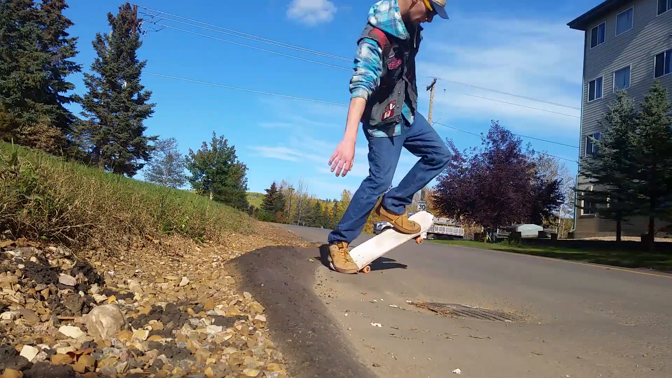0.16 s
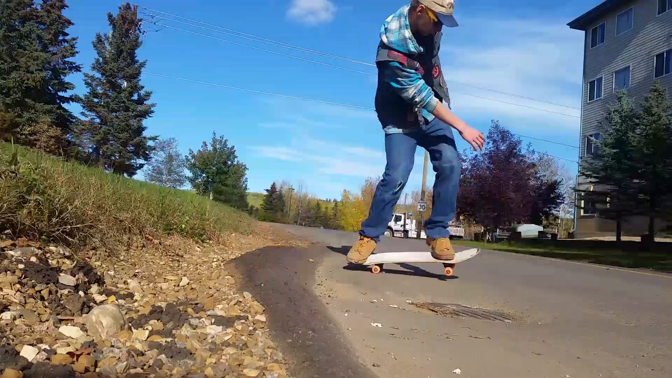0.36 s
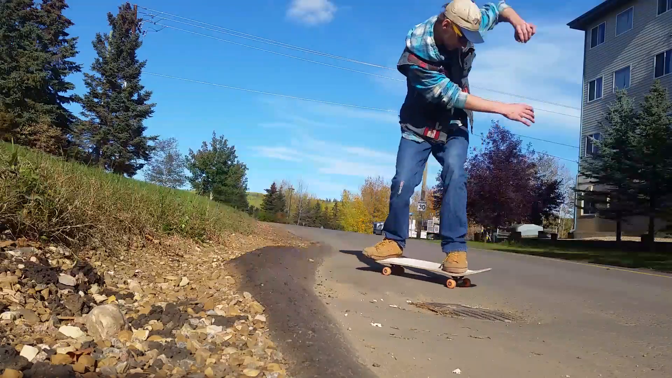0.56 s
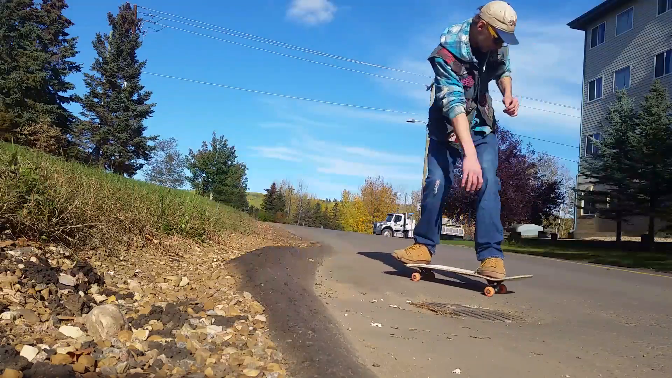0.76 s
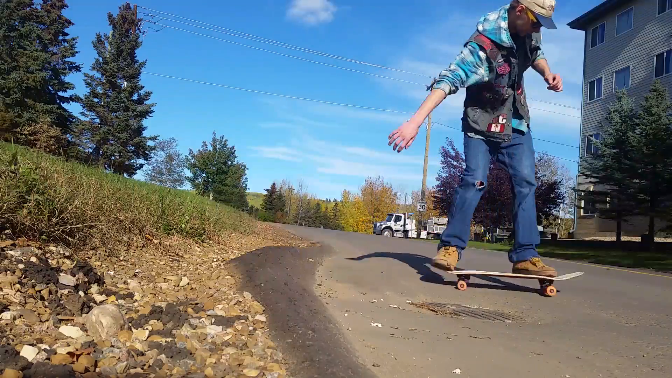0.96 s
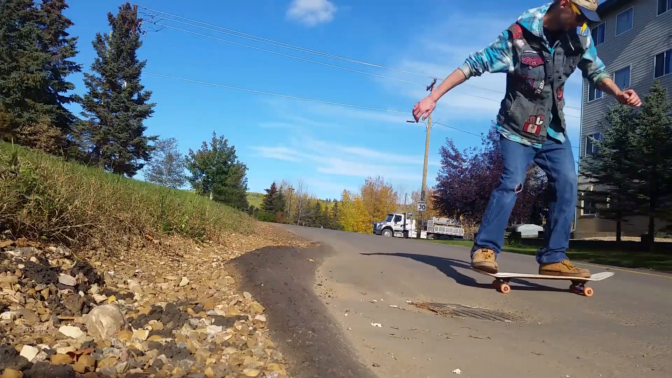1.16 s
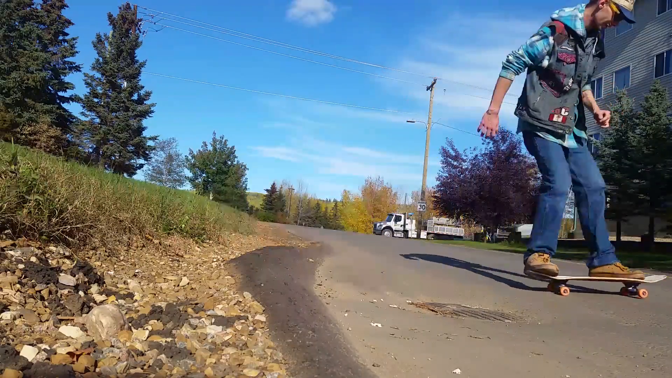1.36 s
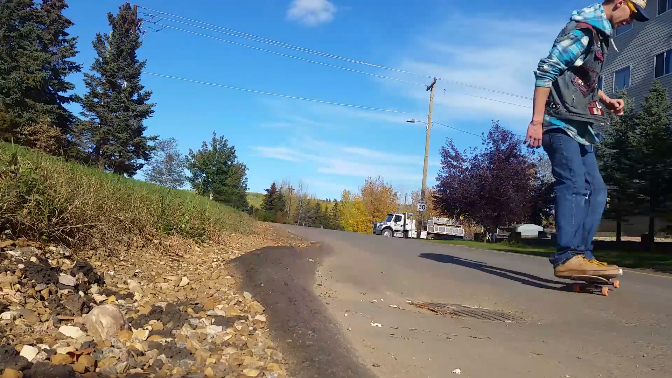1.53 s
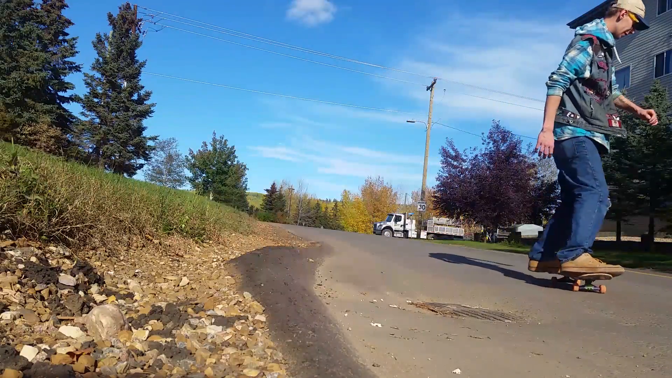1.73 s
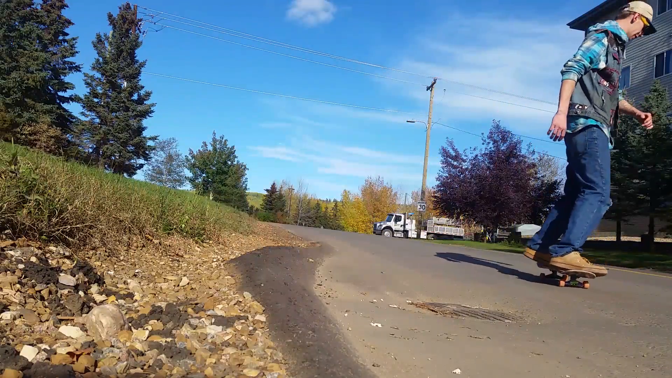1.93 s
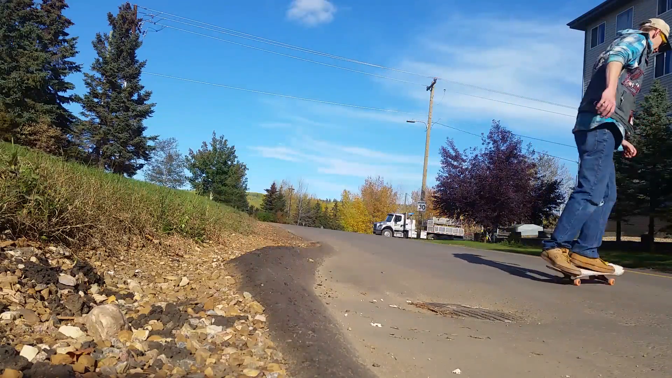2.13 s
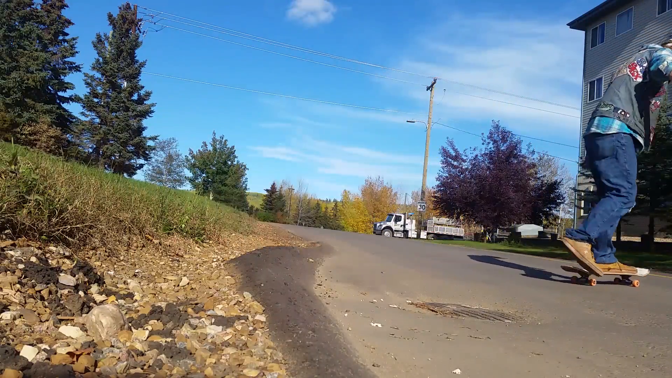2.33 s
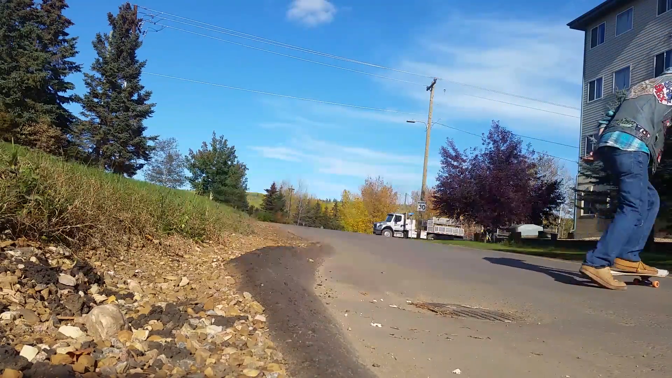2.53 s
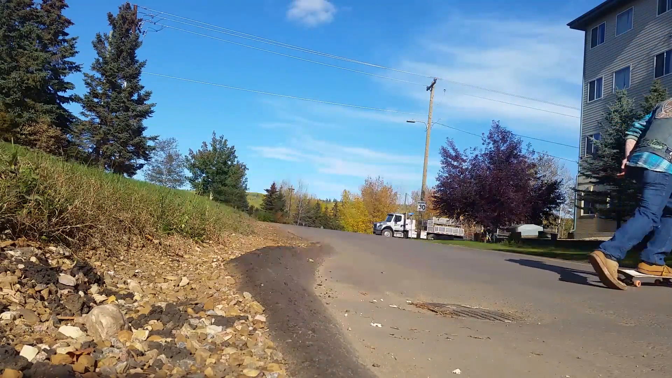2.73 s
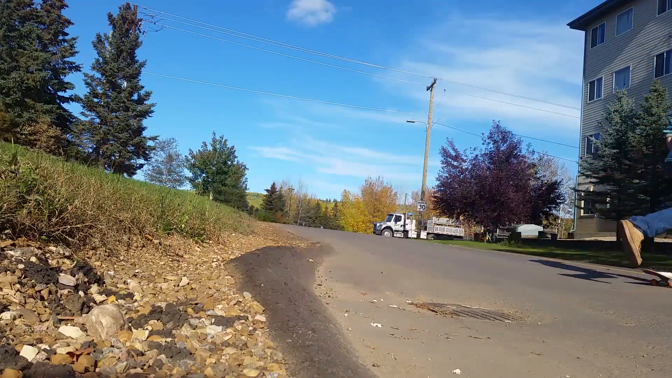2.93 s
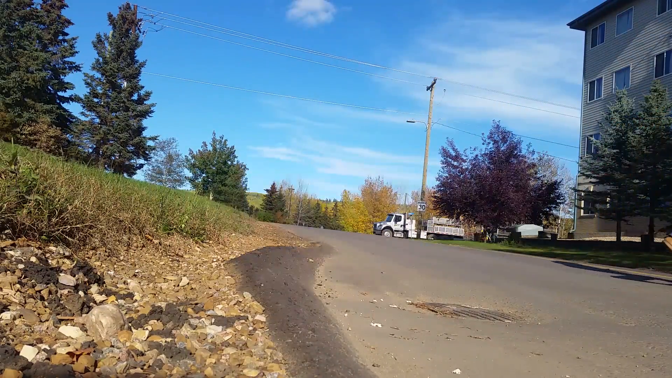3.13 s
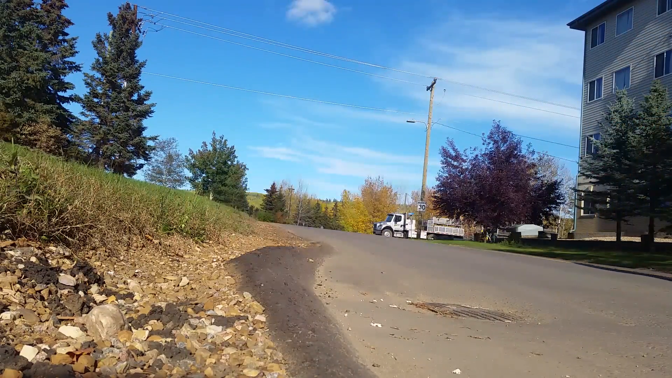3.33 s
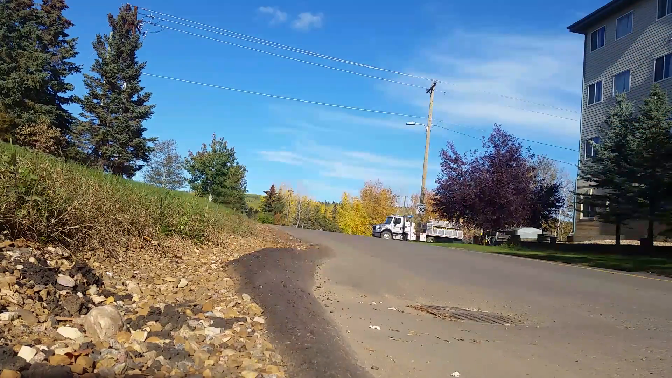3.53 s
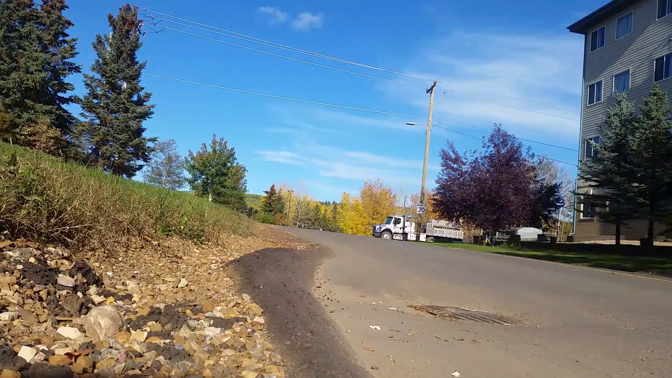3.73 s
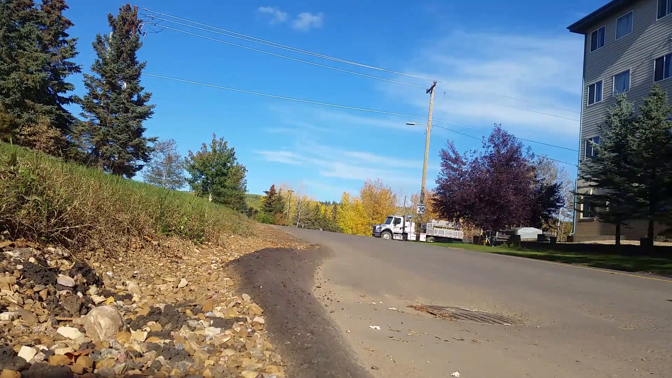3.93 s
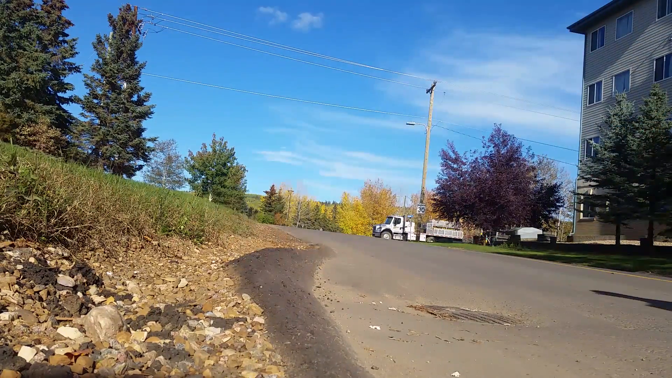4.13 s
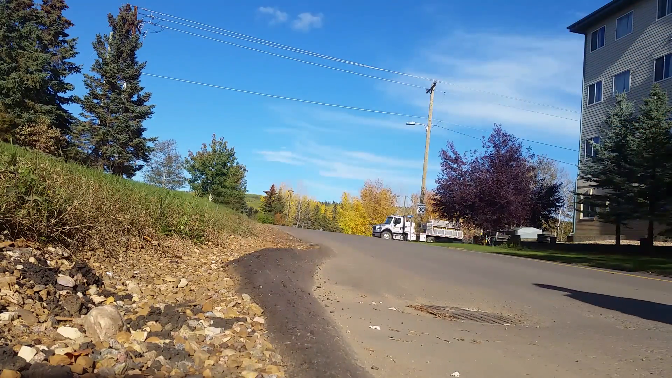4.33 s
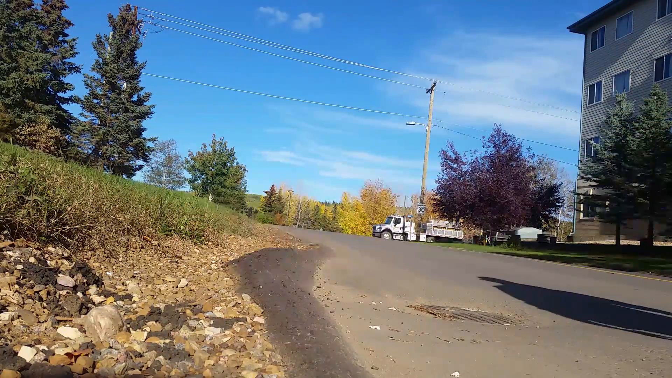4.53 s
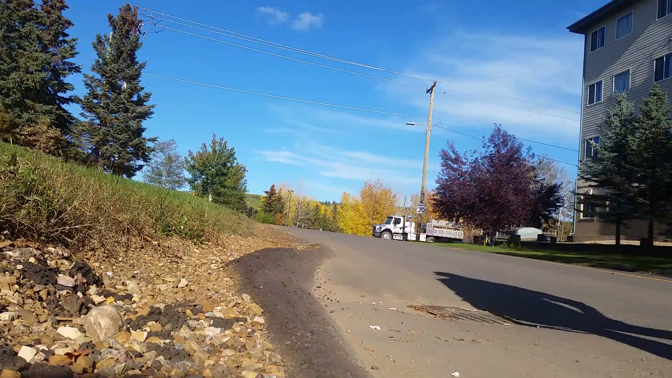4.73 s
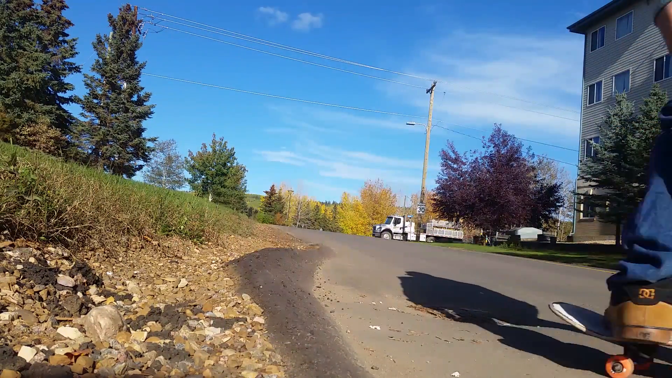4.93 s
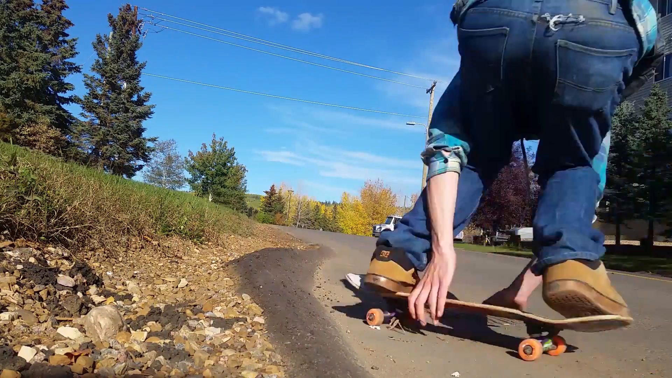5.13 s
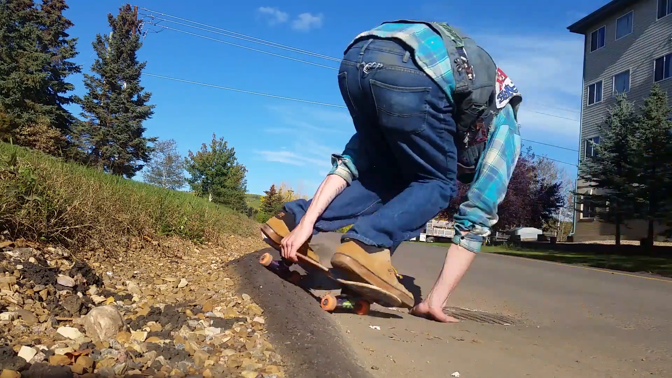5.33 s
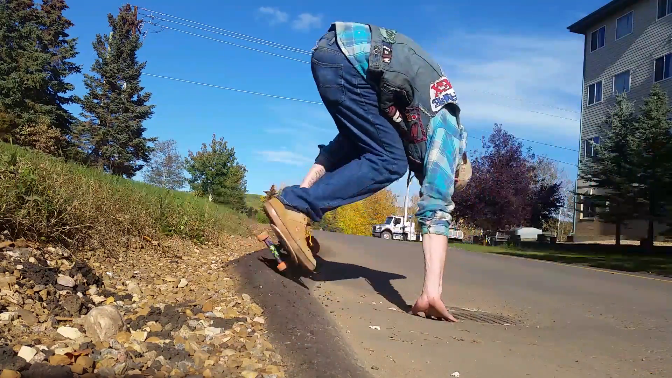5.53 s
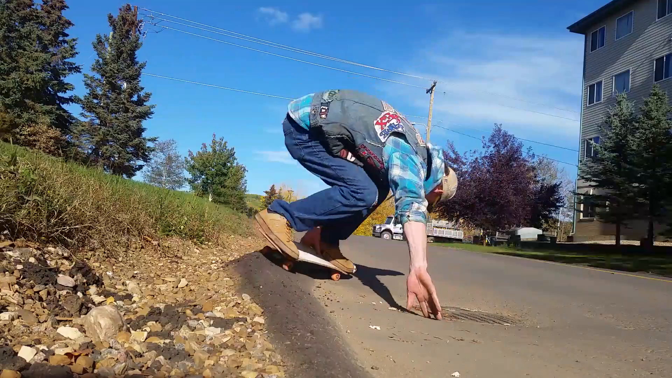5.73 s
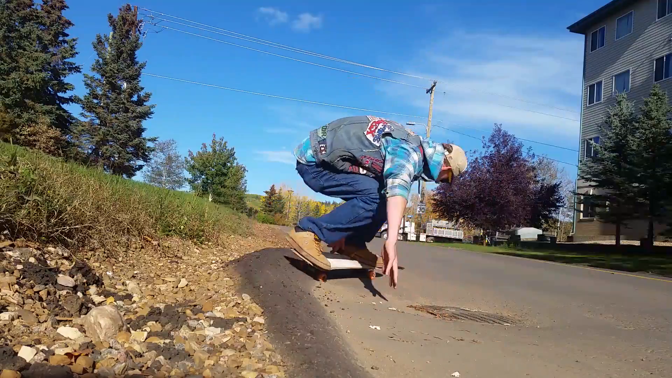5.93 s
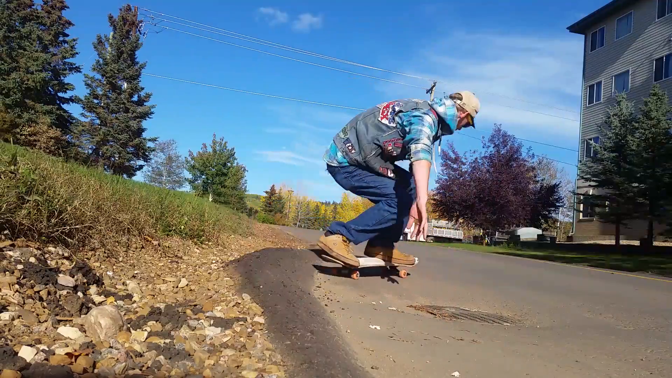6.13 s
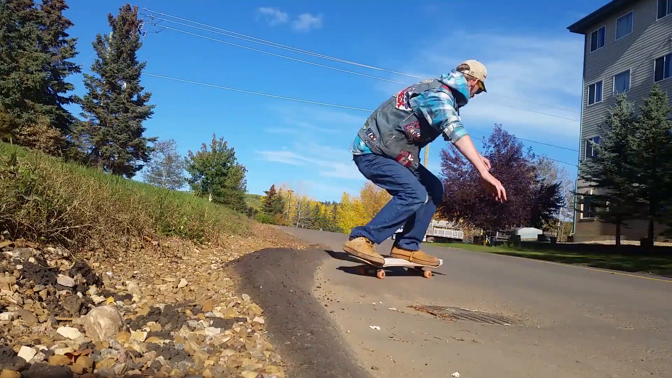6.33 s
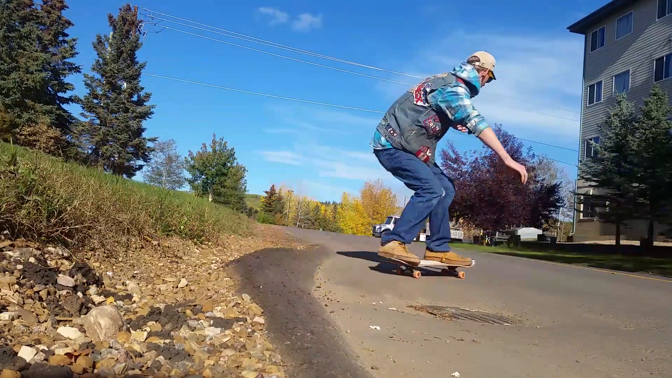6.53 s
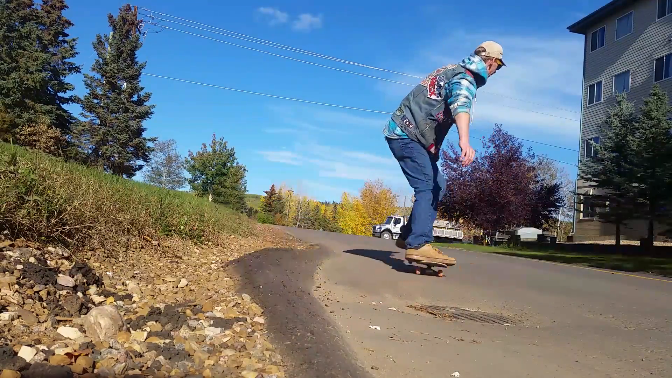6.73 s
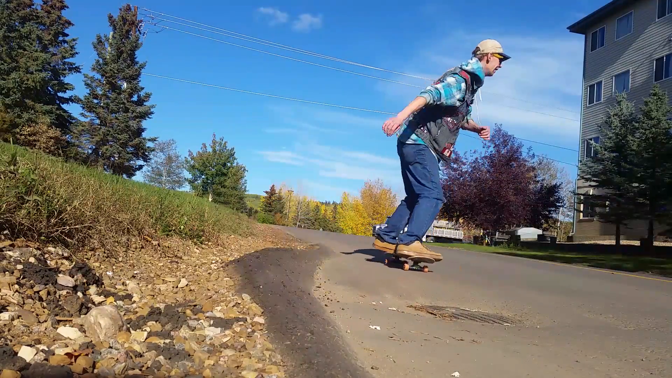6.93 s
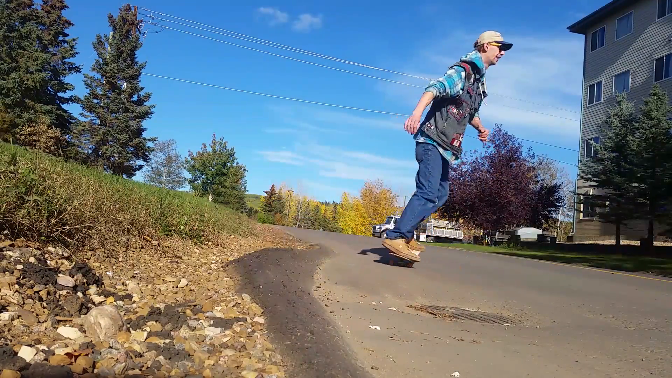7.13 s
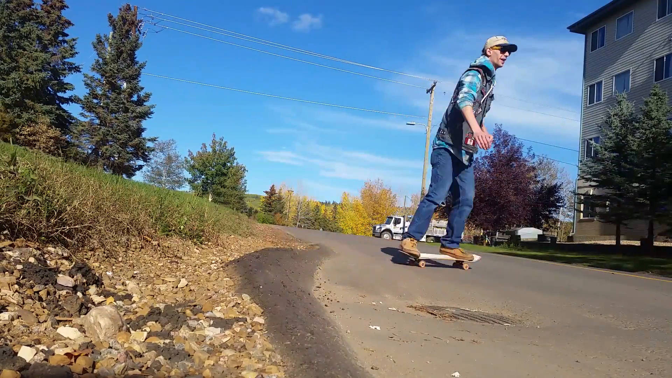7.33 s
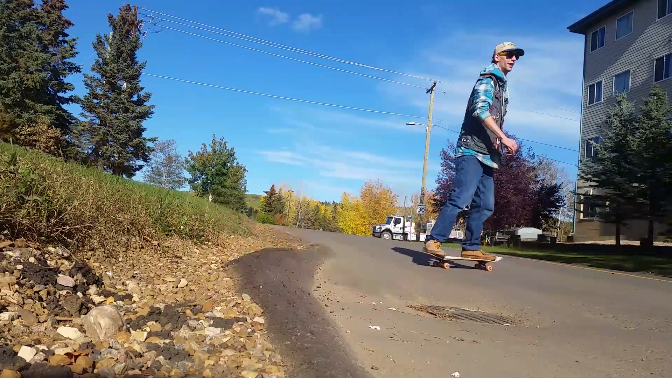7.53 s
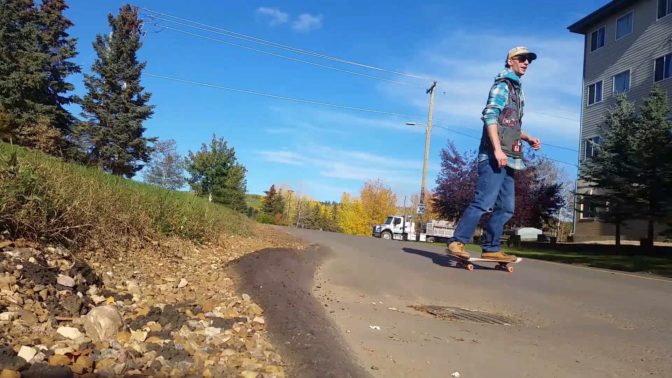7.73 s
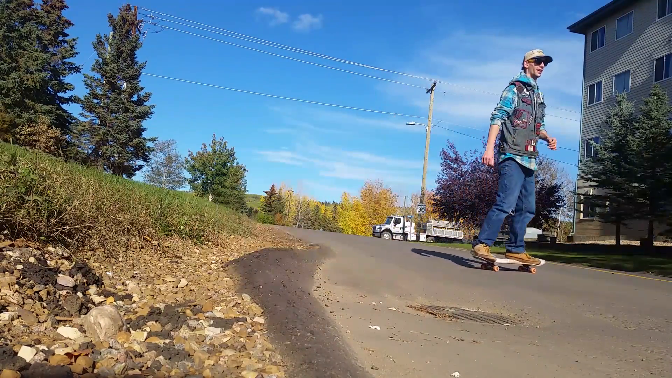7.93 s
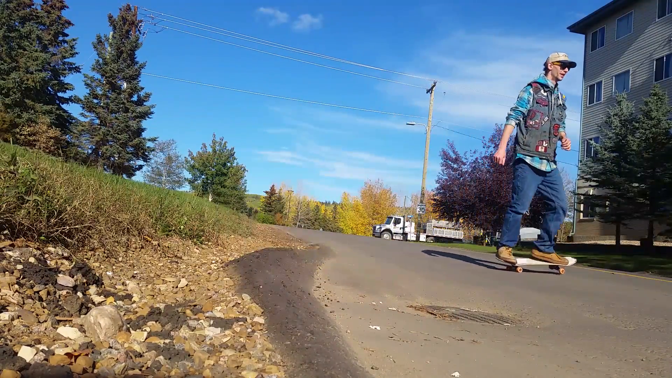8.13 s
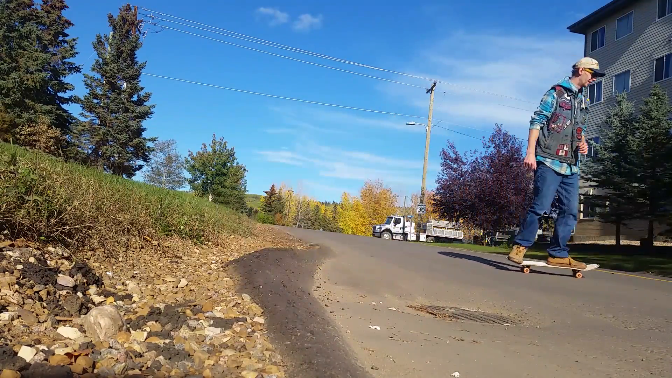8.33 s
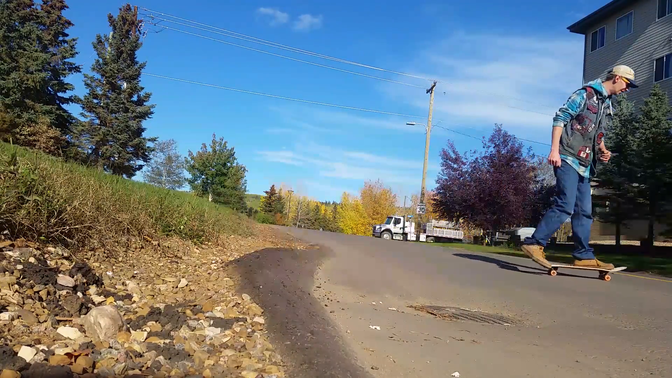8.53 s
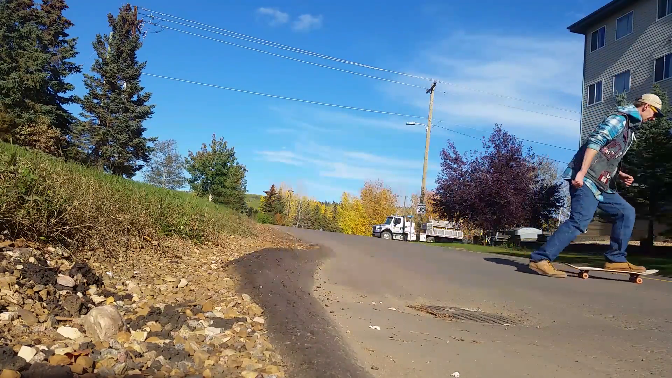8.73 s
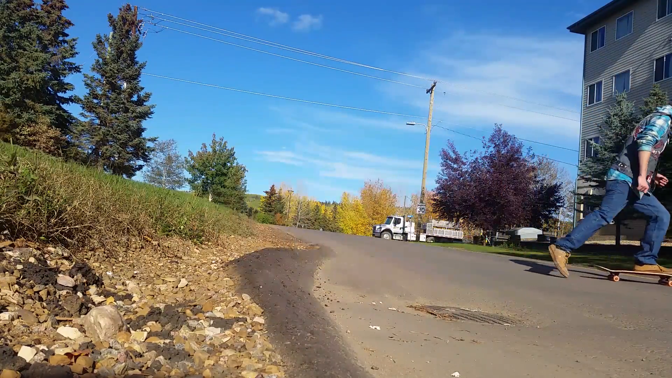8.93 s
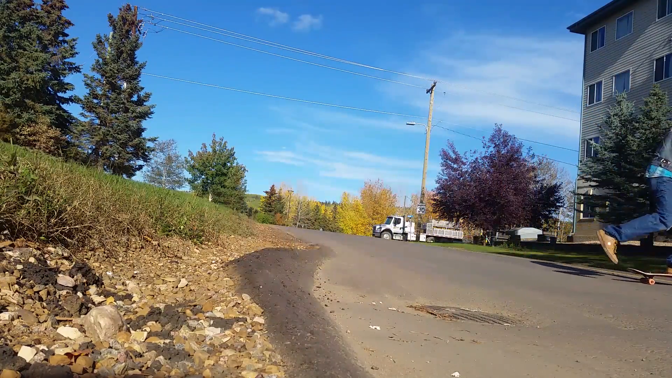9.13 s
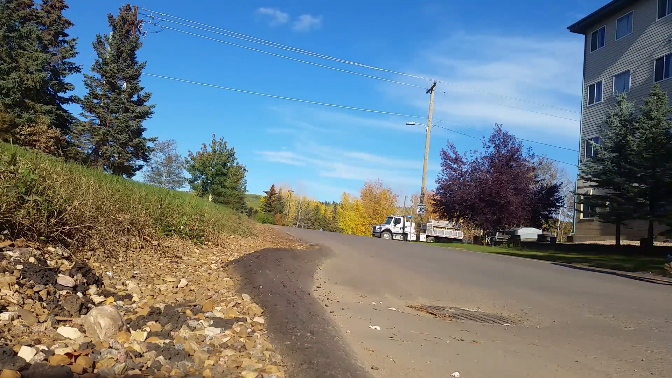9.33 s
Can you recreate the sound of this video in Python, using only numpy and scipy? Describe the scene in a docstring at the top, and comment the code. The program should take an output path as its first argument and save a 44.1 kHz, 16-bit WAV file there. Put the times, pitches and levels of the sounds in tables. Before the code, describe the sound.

Hard skateboard wheels rumble over gritty road, wooden deck slaps in quick runs, a close roaring carve with scraping, then fading rolls and light wind.

```python
"""Hard wheels rumble and rattle over rough asphalt: a skateboard rolls off to the right, comes back close by,
carves up a bank and leaves again. Road grain shakes wheels, trucks and deck, harder in most swerves;
nose slaps ring the board's modes in quick runs, and noise bursts make scrapes, sand and pebble snaps.
Two closely spaced microphone ports hear it outdoors, with light wind and a building that answers."""
import sys
import numpy as np
from scipy import signal
from scipy.fft import rfft, irfft
from scipy.io import wavfile
from scipy.ndimage import uniform_filter1d, map_coordinates

SR = 44100
rng = np.random.default_rng(int(sys.argv[2]) if len(sys.argv) > 2 else 0)


def generate_wav(signal):
    """Clip the signal to [-1, 1] and save it as 16-bit WAV at the path in sys.argv[1]."""
    frames = np.transpose(np.atleast_2d(signal))
    scaled = np.clip(frames, -1, 1) * 32767
    pcm = np.round(scaled).astype(np.int16)
    wavfile.write(sys.argv[1], SR, pcm)


N = 413216
TIME = np.arange(N) / SR

# modes of deck, trucks and wheels: f/Hz, relative level/dB, t60/s
BOARD_MODES = [(127, -10, 0.13), (237, -0.5, 0.036), (389, -1.5, 0.04), (482, -5.5, 0.059),
               (784, -5, 0.027), (900, -6.5, 0.04), (1088, -3, 0.048), (1235, -5.5, 0.065),
               (1579, -4.5, 0.043), (1733, -3, 0.047), (1920, 0, 0.02), (2360, -4.5, 0.028),
               (2586, -4, 0.014), (2860, -9.5, 0.039), (3300, -13.5, 0.014)]
DECK_TOP_HZ = 600   # modes below this belong to the deck's thud


def from_db(db):
    """Decibels to gain."""
    return 10 ** (np.asarray(db) / 20)


def rms_one(x):
    """Scale to rms 1."""
    return x / np.sqrt(np.mean(x ** 2) + 1e-20)


def steadied(x, seconds):
    """Rms 1 over every stretch of this length; quicker lumps stay."""
    return x / np.sqrt(uniform_filter1d(x ** 2, int(seconds * SR)) + 1e-12)


def in_time(rows):
    """Each column of a curve at every sample."""
    s, *columns = np.transpose(rows)
    return [np.interp(TIME, s, column) for column in columns]


def drift(rate):
    """Smooth chance with a spread near 1, changing `rate` times a second."""
    knots = rng.standard_normal(4096)
    return map_coordinates(knots, [TIME * rate], order=2, mode="wrap")


def swell(middle_s, length_s):
    """Bell of height 1, this long at half height."""
    return np.exp2(-np.minimum((2 * (TIME - middle_s) / length_s) ** 2, 60))


def held(start_s, end_s, rise_db_per_s, fall_db_per_s):
    """Gain that rises to 1, holds from start to end and dies away."""
    before_db = rise_db_per_s * np.maximum(start_s - TIME, 0)
    after_db = fall_db_per_s * np.maximum(TIME - end_s, 0)
    return from_db(-np.minimum(before_db + after_db, 200))


def colour(x, spectrum, size=4096):
    """Causal (minimum-phase) filter that follows a spectrum."""
    hz, db = np.transpose(spectrum)
    grid = np.maximum(np.fft.rfftfreq(size, 1 / SR), 1)
    gain = from_db(np.interp(np.log(grid), np.log(hz), db))
    # folding the cepstrum forward in time gives minimum phase
    cepstrum = irfft(np.log(gain))
    cepstrum[1:size // 2] *= 2
    cepstrum[size // 2 + 1:] = 0
    response = irfft(np.exp(rfft(cepstrum)))
    filtered = signal.oaconvolve(np.atleast_2d(x), response[None], axes=1)
    return filtered[:, :x.shape[-1]].reshape(x.shape)


def resonance(x, hz, width_hz):
    """Two-pole resonance with gain 1 on top."""
    r = np.exp(-np.pi * width_hz / SR)
    zeros = np.array([1, 0, -1]) * (1 - r * r) / 2
    poles = [1, -2 * r * np.cos(2 * np.pi * hz / SR), r * r]
    return signal.lfilter(zeros, poles, x)


def gliding(x, hz, width_hz):
    """Narrow resonance whose centre moves: shift to 0 Hz, pass two poles of this width, shift back; rms 1."""
    turn = np.exp(2j * np.pi * np.cumsum(hz) / SR)
    r = np.exp(-np.pi * width_hz / SR)
    narrowed = signal.lfilter([1], [1, -2 * r, r * r], x / turn)
    return rms_one((narrowed * turn).real)


def add(track, s, sound):
    """Mix a sound into a track at time s."""
    start = int(s * SR)
    track[start:start + len(sound)] += sound[:N - start]


def road_grain(per_s, spread_db, lumps_db, smooth):
    """Force on the wheels: chips of uneven size, met in clumps, over a fine even texture."""
    sizes = from_db(spread_db * np.minimum(rng.exponential(1, N), 4)) * rng.choice([-1, 1], N)
    chips = rms_one(sizes * (rng.random(N) < per_s / SR))
    texture = smooth * rng.standard_normal(N)
    return (chips + texture) * from_db(lumps_db * drift(70))


def ride():
    """Levels in dB of rumble, rattle, crunch and hiss: all sink while unweighted and shift in a swerve."""
    # rolling level, set by speed, distance and surface: t/s, wheel rumble level/dB, grit level/dB
    # (before the changes of load and swerve)
    roll_levels = [(0, -40, -56), (0.55, -40.5, -65), (0.95, -38, -58), (1.6, -34.5, -59), (2.8, -40, -65),
                   (3.45, -31, -65), (3.6, -33, -74), (4.33, -28, -58), (4.45, -19, -56.5),
                   (4.95, -19, -54), (5.25, -16.5, -49), (5.63, -13, -47.5), (5.82, -28, -53),
                   (6.2, -20, -55), (6.42, -38.5, -64), (6.8, -28, -60), (7.6, -33.5, -58.5),
                   (7.98, -43, -76), (8.6, -43, -69), (9.37, -36.5, -71.5)]
    # the rider leans in and the wheels bite, or he eases off:
    # middle t/s, length t/s, extra rattle level/dB, extra rumble level/dB
    swerves = [(0.06, 0.11, 3, 9), (0.224, 0.082, 12, 10.5), (0.397, 0.18, 3.5, 2.5), (0.977, 0.24, 0, 9),
               (1.395, 0.068, 0.5, 6.5), (1.574, 0.1, 2.5, 3), (2.042, 0.033, 11.5, -19),
               (2.23, 0.25, 9.5, 5.5), (2.6, 0.13, 5.5, 8), (3.02, 0.33, 9, 1.5), (3.566, 0.18, 10, 5.5),
               (3.998, 0.67, 11.5, 5.5), (4.4, 0.17, 0, -1.5), (5.619, 0.22, 12, 0.5),
               (7.243, 0.29, 10, 2.5), (7.467, 0.07, 7.5, 3), (8.3, 0.26, 10, 5), (8.938, 0.2, 18, -5.5),
               (9.29, 0.055, 13, 0)]
    # the lifted wheels come down: t/s
    landings = [0.631, 1.166, 1.85, 2.376, 5.722, 5.9, 6.236, 7.028, 7.544, 8.451]
    cruise_rumble_db, cruise_grit_db, cruise_rattle_db = -36, -61, -46.5
    # weight comes off the wheels before each slap and again on the rebound
    lift_lead_s, lift_s, lift_db = 0.091, 0.15, -4.5
    rebound_lag_s, rebound_s, rebound_db = 0.11, 0.21, -7.5
    # the factors below are dB per dB
    rattle_per_rumble, rattle_per_grit, rattle_per_load, grit_per_load = 0.45, 0.54, 0.79, 0.42
    crunch_per_bite, hiss_per_bite, crunch_per_rumble = 0.65, 0.092, 0.077

    rumble_db, grit_db = in_time(roll_levels)
    heavier, grittier = rumble_db - cruise_rumble_db, grit_db - cruise_grit_db
    load_db = sum(lift_db * swell(s - lift_lead_s, lift_s)
                  + rebound_db * swell(s + rebound_lag_s, rebound_s) for s in landings)
    bite_db, press_db = sum(np.outer(extra_db, swell(s, length)) for s, length, *extra_db in swerves)
    rattle_db = cruise_rattle_db + rattle_per_rumble * heavier + rattle_per_grit * grittier
    rattle_db = rattle_db + bite_db + rattle_per_load * load_db
    grit_db = grit_db + grit_per_load * load_db
    crunch_db = grit_db + crunch_per_bite * bite_db + crunch_per_rumble * (heavier - grittier)
    hiss_db = grit_db + hiss_per_bite * bite_db
    return rumble_db + press_db + load_db, rattle_db, crunch_db, hiss_db


def rolling(rumble_db, rattle_db, crunch_db, hiss_db, ring_db=-11.5):
    """Grain drives rumble, deck bounce, board modes and crunch; pressed wheels drone; hiss is returned apart."""
    # colours of the rolling sounds: f/Hz, level/dB per Hz
    rumble_spectrum = [(25, -30), (55, -18), (90, -2.5), (140, -0.5), (185, 0), (260, -1.5), (350, -7),
                       (480, -8.5), (700, -16.5), (1100, -29), (2500, -90.5)]
    rattle_spectrum = [(150, -0.5), (330, 2.5), (480, 2.5), (620, 2.5), (850, 1.5), (1200, 7.5), (1430, 3),
                       (1750, 5.5), (2050, -9), (2450, -30), (3000, -36), (6000, -43)]
    crunch_spectrum = [(900, -34), (2000, 20.5), (2900, 13), (4000, 7), (5500, -6), (7000, -17.5),
                       (10000, -27.5), (14500, -15.5)]
    hiss_spectrum = [(1500, -30), (2800, 3), (4000, 1), (5500, 0), (7000, -9.5), (10000, -3), (14500, -1)]
    # the deck bounces on its wheels, its pitch shifting with speed and stance: t/s, f/Hz
    bounce_pitch = [(0, 132), (0.25, 208), (0.8, 104.4), (1.1, 114), (1.6, 141.6), (2.2, 214),
                    (2.65, 108.4), (3.2, 200), (3.75, 142.6), (4.7, 179.4), (5.5, 143.5), (6.1, 174),
                    (6.8, 127), (7.3, 138), (8.0, 112), (9.37, 120)]
    bounce_db, bounce_width_hz = -3.5, 38.7   # level against the rumble
    tyre_softness_hz = 2300
    drone_hz, drone_width_hz, drone_wander, drone_db = 468, 75, 0.025, -19

    wheels = road_grain(per_s=1500, spread_db=2.5, lumps_db=1.0, smooth=1.52)
    rumble = steadied(colour(wheels, rumble_spectrum), seconds=0.063)
    bounce = gliding(rng.standard_normal(N), in_time(bounce_pitch)[0], bounce_width_hz)
    rumble = rms_one(rumble + from_db(bounce_db) * steadied(bounce, seconds=0.22))

    front, rear = (road_grain(per_s=480, spread_db=3.6, lumps_db=2.8, smooth=0.5) for _ in range(2))
    ringing = np.zeros(N)
    for k, (hz, db, t60) in enumerate(BOARD_MODES):
        if hz > DECK_TOP_HZ:
            width_hz = 2 * np.log(1000) / (np.pi * t60)   # the rider's feet halve the ring time
            ringing += from_db(db) * resonance((front, rear)[k % 2], hz, width_hz)
    # soft urethane passes little treble on to the deck
    ringing = signal.sosfilt(signal.butter(4, tyre_softness_hz, fs=SR, output="sos"), ringing)
    rattle = rms_one(colour(front + rear, rattle_spectrum)) + from_db(ring_db) * rms_one(ringing)
    rattle = steadied(rattle, seconds=0.24)

    # hard-pressed wheels drone in the carve, keep contact and roar evenly
    pressed = held(5.22, 5.48, rise_db_per_s=76, fall_db_per_s=84)
    wandering_hz = drone_hz * (1 + drone_wander * drift(10))
    drone = steadied(gliding(rng.standard_normal(N), wandering_hz, drone_width_hz), seconds=0.043)
    rattle = (1 - pressed) * rattle + pressed * steadied(rattle, seconds=0.015)
    board = from_db(rumble_db) * rumble + from_db(rattle_db) * rattle + from_db(drone_db) * pressed * drone

    crunch = steadied(colour(front + rear + rng.standard_normal(N), crunch_spectrum), seconds=0.16)
    # fine hiss scatters off the road and differs between the ports
    flicker = from_db(2.0 * drift(140))
    hiss = rms_one(colour(rng.standard_normal((2, N)) * flicker, hiss_spectrum))
    # above -61.5 dB the hiss rises twice as fast, so it stands out in the loud passes
    hiss_gain = from_db(hiss_db - 2.5 + np.maximum(hiss_db + 61.5, 0))
    return board + from_db(crunch_db + 5.0) * crunch, hiss_gain * hiss


def contacts(rattle_db):
    """Every blow on the board: landings, bumps, large pebbles and random small ones."""
    # wheel strikes, in quick runs at landings and singly at bumps; the place of a blow favours some modes:
    # t/s, wooden clack level/dB, deck thud level/dB, hard truck edge level/dB, grit tick level/dB,
    # favoured thud f/Hz, favoured clack f/Hz
    blows = [(0.061, -27.5, -24.5, -39, -58, 200, 1700), (0.631, -18.5, -28, -28.5, -40, 255, 1520),
             (0.644, -21.5, -19, -31, -40, 255, 1000), (0.6525, -19, -18, -33.5, -41, 255, 1650),
             (0.660, -20.5, -16.5, -34, -59, 142, 940), (1.165, -25, -31, -39, -38, 380, 1320),
             (1.177, -28, -19, -38, -55, 138, 1600), (1.191, -27, -27, -40, -38, 380, 1200),
             (1.199, -28.5, -29, -39, -36, 255, 1700), (1.218, -29, -26, -35, -42, 380, 1700),
             (1.237, -30, -25, -40, -41, 380, 1400), (1.8485, -14.5, -16, -32, -58, 382, 1690),
             (1.851, -10.5, -15.5, -25.5, -37, 380, 1100), (1.8595, -15, -18, -38, -55, 380, 1680),
             (1.867, -21, -17, -39, -54, 384, 1100), (2.375, -18, -17.5, -25.5, -40, 260, 1700),
             (2.386, -31, -21, -32, -54, 382, 1100), (2.4095, -22, -16, -28, -41, 446, 1430),
             (2.4155, -27, -26.5, -37, -45, 440, 1100), (5.128, -13, -16, -23.5, -37, 143, 1670),
             (5.156, -18, -15, -32, -46, 255, 1700), (5.314, -21, -10.5, -36, -44, 380, 1290),
             (5.626, -23, -10.5, -38, -40, 380, 1200), (5.649, -15, -11.5, -40, -42, 380, 990),
             (5.7235, -18.5, -13.5, -39, -37, 255, 1200), (5.733, -15, -16.5, -46, -38, 255, 1200),
             (5.7425, -21, -25, -40, -38, 380, 1290), (5.9005, -19.5, -13, -39, -54, 370, 1190),
             (5.9145, -15.5, -13, -26, -52, 375, 1500), (5.937, -20.5, -9, -44, -51, 198, 1100),
             (5.947, -21, -18, -44, -57, 380, 1600), (5.960, -25, -19, -40, -42, 376, 1110),
             (5.997, -24.5, -17.5, -39, -53, 255, 1250), (6.045, -22, -21, -49, -40, 255, 1700),
             (6.236, -18, -14, -31, -59, 282, 1820), (6.249, -21, -14, -38, -57, 376, 1700),
             (6.579, -25, -25.5, -35.5, -66, 255, 1700), (7.0295, -20.5, -18.5, -43, -55, 294, 1250),
             (7.0325, -10.5, -10, -29.5, -45, 500, 1220), (7.5425, -22, -23, -28.5, -33, 303, 1900),
             (7.5505, -17, -21.5, -33, -35, 326, 1120), (7.554, -13.5, -23, -29.5, -51, 380, 1940),
             (7.571, -22.5, -22.5, -47, -51, 380, 1090), (8.4505, -22, -25, -38, -55, 450, 1390),
             (8.480, -23, -22, -34.5, -45, 460, 1690)]
    # the wheels click over the larger pebbles: t/s, clack level/dB
    large_pebbles = [(0.243, -32.5), (1.007, -30), (1.524, -32.5), (1.596, -34), (2.013, -37),
                     (2.325, -29.5), (2.633, -33.5), (2.757, -29.5), (2.847, -29), (2.877, -31.5),
                     (6.130, -27.5), (6.156, -28.5), (6.204, -37), (6.223, -28), (6.537, -34.5),
                     (6.657, -31.5), (6.807, -32.5), (6.970, -31), (7.226, -29.5), (7.271, -26),
                     (8.899, -32.5)]
    # a pebble's thud, edge and tick in dB against its clack; its favoured thud and clack in Hz
    pebble_db, pebble_hz = np.array((-5, -17, -38.5)), (230, 1430)
    # small pebbles come at random and follow the rattle up to a ceiling
    small_per_s, over_rattle_db, ceiling_db, spread_db = 22, 4.0, -38.5, 2

    met = np.flatnonzero(rng.random(N) < small_per_s / SR)
    small_db = np.minimum(rattle_db + over_rattle_db, ceiling_db) + spread_db * rng.standard_normal(N)
    pebbles = list(large_pebbles) + [(TIME[i], small_db[i]) for i in met]
    return list(blows) + [(s, db, *(db + pebble_db), *pebble_hz) for s, db in pebbles]


def knocks(blows, crack_t60=0.0072, chatter_t60=0.067, chatter_db=-13.0, tick_t60=0.021, vary_db=4.0,
           detune=0.011, thud_db_per_octave=7.5, clack_db_per_octave=17.0, ring_db=-8.0, squash_s=0.00077):
    """Each contact rings the modes nearest its favoured pitches; grit cracks and the trucks chatter briefly."""
    # colours of the noise in a blow: f/Hz, level/dB per Hz
    crack_spectrum = [(250, -18), (550, 1.5), (800, 3), (1100, 2), (1500, -1), (1900, 3), (2300, -9),
                      (2900, -28), (5500, -41.5), (14000, -41.5)]
    edge_spectrum = [(1200, -34.5), (2300, 3.5), (2900, -1.5), (3400, -1), (4200, -12.5), (5300, -15),
                     (7000, -33.5), (14000, -40.5)]
    tick_spectrum = [(1500, -21), (3500, 4), (5500, 5.5), (7000, -5), (8500, 14), (11000, -1),
                     (14500, -1.5)]
    wood_top_hz = 2200   # modes above this belong to the trucks
    blow_s = 0.004       # a part's level is its energy spread over this time
    out, t = np.zeros(N), TIME[:SR // 8]
    hz, level_db, t60 = np.transpose(BOARD_MODES)[:, :, None]
    deck, trucks = hz[:, 0] < DECK_TOP_HZ, hz[:, 0] > wood_top_hz
    signs = (-1) ** np.arange(len(hz))[:, None]
    squash = 1 - np.exp(-t / squash_s)      # soft wheels take a moment to pass on the blow
    dying = from_db(-60 * t / crack_t60) + from_db(chatter_db - 60 * t / chatter_t60)
    # the rider's feet soak up the first swing
    ringing = from_db(-60 * t / crack_t60) + from_db(ring_db - 60 * t / t60)

    for s, clack_db, thud_db, edge_db, tick_db, thud_hz, clack_hz in blows:
        strength, load = rng.standard_normal((2, len(hz), 1))
        crack, grit = rng.standard_normal((2, len(t)))
        away_db = np.where(deck[:, None], thud_db_per_octave * np.abs(np.log2(hz / thud_hz)),
                           clack_db_per_octave * np.abs(np.log2(hz / clack_hz)))
        # the rider's shifting weight detunes the modes a little
        swing = np.sin(2 * np.pi * hz * (1 + detune * load) * t)
        modes = signs * from_db(level_db - away_db + vary_db * strength) * ringing * squash * swing
        crack = crack * dying * squash
        thud = modes[deck].sum(0)
        clack = rms_one(modes[~deck & ~trucks].sum(0)) + rms_one(colour(crack, crack_spectrum))
        edge = rms_one(modes[trucks].sum(0)) + rms_one(colour(crack, edge_spectrum))
        tick = colour(grit * squash * from_db(-60 * t / tick_t60), tick_spectrum)
        for part, db in ((thud, thud_db), (clack, clack_db), (edge, edge_db), (tick, tick_db)):
            add(out, s, from_db(db) * np.sqrt(blow_s * SR) * part / np.linalg.norm(part))
    return out


def scrape():
    """Wood and urethane slip over the road: a dense fine rasp, and coarse bursts from sharp chips."""
    # colour of the rasp: f/Hz, level/dB per Hz
    rasp_spectrum = [(600, -13), (1200, 9.5), (1800, 8), (2600, 1.5), (3600, -7), (4600, -9), (6500, -25.5),
                     (14000, -32)]
    # the tail drags on the asphalt, or the wheels skid sideways:
    # start t/s, end t/s, level/dB, share of coarse grains [0-1]
    skids = [(0.01, 0.43, -41.5, 0.63), (0.2, 0.302, -45, 0.9), (1.18, 1.255, -42, 0.74),
             (5.487, 5.66, -38.5, 1), (5.683, 5.74, -43, 0.8), (5.905, 5.968, -37, 0.9),
             (6.006, 6.194, -49.5, 0.85), (8.857, 9.015, -55.5, 0.3)]
    sharp_chips = road_grain(per_s=900, spread_db=3.4, lumps_db=3.2, smooth=0.25)
    dense_grain = road_grain(per_s=4000, spread_db=2.5, lumps_db=1.5, smooth=0.5)
    coarse = steadied(colour(sharp_chips, rasp_spectrum), seconds=0.06)
    fine = steadied(colour(dense_grain, rasp_spectrum), seconds=0.03)
    out = np.zeros(N)
    for start, end, db, share in skids:
        rasp = np.sqrt(share) * coarse + np.sqrt(1 - share) * fine
        out += from_db(db) * held(start, end, rise_db_per_s=418, fall_db_per_s=404) * rasp
    return out


def chafe(width_hz=220):
    """Urethane slipping sideways sings a short, rough, narrow note: noise through two equal resonances."""
    # middle t/s, length t/s, f/Hz, level/dB
    notes = [(1.58, 0.12, 1770, -53), (2.2, 0.2, 1710, -41.5), (4.0, 0.16, 1710, -38.5),
             (4.237, 0.095, 2090, -39), (4.444, 0.068, 1580, -30)]
    slip = rng.standard_normal(N)
    out = np.zeros(N)
    for s, length, hz, db in notes:
        note = rms_one(resonance(resonance(slip, hz, width_hz), hz, width_hz))
        out += from_db(db) * swell(s, length) * note
    return out


def sand():
    """Wheels grind loose sand: dense, very bright crackle that swells and fades over each patch."""
    # middle t/s, length t/s, level/dB
    patches = [(0.39, 0.11, -52), (1.22, 0.068, -48), (6.574, 0.042, -55), (6.85, 0.028, -50)]
    # colour of crushed sand: f/Hz, level/dB per Hz
    sand_spectrum = [(2500, -32), (6000, -23), (10500, -7), (14500, -4), (16000, -29)]
    grains = road_grain(per_s=1500, spread_db=3.0, lumps_db=3.0, smooth=0.4)
    crackle = steadied(colour(grains, sand_spectrum), seconds=0.098)
    return sum(from_db(db) * swell(s, length) for s, length, db in patches) * crackle


def stones(t60=0.0048, low_hz=5500, lift_db=14.0):
    """A loose stone pinched under a wheel gives one very short bright snap of high-passed noise."""
    # t/s, peak level/dB before the common lift
    snaps = [(5.128, -36), (5.392, -37), (5.682, -30), (5.959, -41), (6.037, -36), (6.709, -50)]
    out, t = np.zeros(N), TIME[:SR // 40]
    high_pass = signal.butter(2, low_hz, "high", fs=SR, output="sos")
    for s, peak_db in snaps:
        snap = signal.sosfilt(high_pass, rng.standard_normal(len(t)) * from_db(-60 * t / t60))
        add(out, s, from_db(peak_db + lift_db) * snap / np.abs(snap).max())
    return out


def ports(x, scatter):
    """The nearer port hears the board first; the two ports differ a little in colour."""
    # direction of the board: t/s, delay of the left port behind the right [ms]
    bearing = [(0, 0), (1.62, .2), (2.5, .2), (3.49, .27), (3.52, .46), (4.82, .46), (5.35, .05),
               (5.75, -.04), (6.85, .06), (7.4, .06), (9.37, .25)]
    # colour difference of the ports: f/Hz, left minus right level/dB
    port_balance = [(100, -2.0), (600, -2.0), (1300, -1.2), (2400, 2), (4300, -2.5), (7000, -8),
                    (12000, 2.5)]
    lag = in_time(bearing)[0] * SR / 1000   # samples
    pair = []
    for side, hiss in zip((1, -1), scatter):   # left, right
        arrived = map_coordinates(x, [np.arange(N) - side * lag / 2], order=3) + hiss
        pair.append(colour(arrived, [(hz, side * db / 2) for hz, db in port_balance]))
    return np.array(pair)


def street(x, near_db=-8.0, near_t60=0.026, far_db=-16.0, far_s=0.084, far_width_s=0.068,
           tail_db=-27.5, tail_t60=0.77):
    """Scatter from the bank nearby, a smeared answer from the building, and a faint tail from the trees."""
    # colours of the reflections: f/Hz, level/dB
    bank_colour = [(150, -16.5), (600, -5.5), (1500, -3), (2600, 2.5), (5000, 1), (14000, -18.5)]
    wall_colour = [(300, -11.5), (1500, -11.5), (2000, -8.5), (2500, 3.5), (3200, -2.5), (4200, 1.5),
                   (14000, -23)]
    t = TIME[:SR // 2]

    def answer(envelope, db, spectrum):
        """Stereo reflection: the sound convolved with coloured noise of this shape in time."""
        noise = rng.standard_normal((2, len(envelope)))
        response = colour(noise * envelope / np.linalg.norm(envelope), spectrum)
        return from_db(db) * signal.oaconvolve(x[None], response, axes=1)[:, :N]

    # the board moves, so the paths off the bank keep changing
    paths = np.array([drift(9) for _ in range(5)])
    paths /= np.linalg.norm(paths, axis=0)
    near = from_db(-60 * t[:SR // 8] / near_t60)
    bank = sum(share * answer(near, near_db, bank_colour) for share in paths)
    building = answer(np.exp(-((t - far_s) / far_width_s) ** 2), far_db, wall_colour)
    trees = answer(from_db(-60 * t / tail_t60), tail_db, wall_colour)
    return bank + building + trees


def outdoors(gust_hz=7.6, flutter_db=2.5, air_db=-42.5):
    """Lumpy wind noise, mostly on the right port, over a faint distant hum of coloured noise."""
    # gusts on the ports: middle t/s, length t/s, level/dB before the offset of each port
    gusts = [(0.3, 0.92, -61), (3.72, 0.34, -36), (4.603, 0.94, -33), (5.93, 0.47, -28.5),
             (6.86, 0.85, -36.5), (8.195, 0.32, -41)]
    # colours of wind and distance: f/Hz, level/dB per Hz
    wind_spectrum = [(15, -5), (28, -8.5), (50, 3.5), (90, 3.5), (200, -15.5), (600, -69.5)]
    air_spectrum = [(30, -0.5), (120, 8), (300, -15), (700, -14), (1500, -29.5), (3000, -41), (7000, -54.5),
                    (14500, -57.5)]
    breeze = sum(from_db(db) * swell(s, length) for s, length, db in gusts)
    flutter = from_db(flutter_db * drift(gust_hz))
    wind = breeze * flutter * rms_one(colour(rng.standard_normal((2, N)), wind_spectrum))
    # the hum is nearly the same on both ports
    hum = rng.standard_normal(N) + 0.21 * rng.standard_normal((2, N))
    return wind * from_db([[-3.0], [6.0]]) + from_db(air_db) * rms_one(colour(hum, air_spectrum))


def scene():
    """Board, street and wind at the two ports."""
    rumble_db, rattle_db, crunch_db, hiss_db = ride()
    roll, scatter = rolling(rumble_db, rattle_db, crunch_db, hiss_db)
    board = roll + knocks(contacts(rattle_db)) + scrape() + chafe() + sand() + stones()
    return ports(board, scatter) + street(board) + outdoors()


def record(dry):
    """The level dips briefly near 3.5 s; the sound is hollow around 8.4 kHz; the top is cut steeply."""
    # overall treble colour: f/Hz, level/dB
    treble_colour = [(20, -0.5), (6200, -1.5), (7300, -5), (8400, -28), (9600, -16), (11200, 2.5),
                     (14500, 0)]
    dip_db, = in_time([(3.488, 0), (3.498, -28), (3.513, -28), (3.524, 0)])   # t/s, level/dB
    heard = colour(dry * from_db(dip_db), treble_colour)
    top_cut = signal.ellip(10, 0.2, 70, 14750, fs=SR, output="sos")   # 0.2 dB ripple, 70 dB down, cutoff Hz
    return signal.sosfilt(top_cut, heard)


dry = scene()
out = record(dry)
generate_wav(out)
```